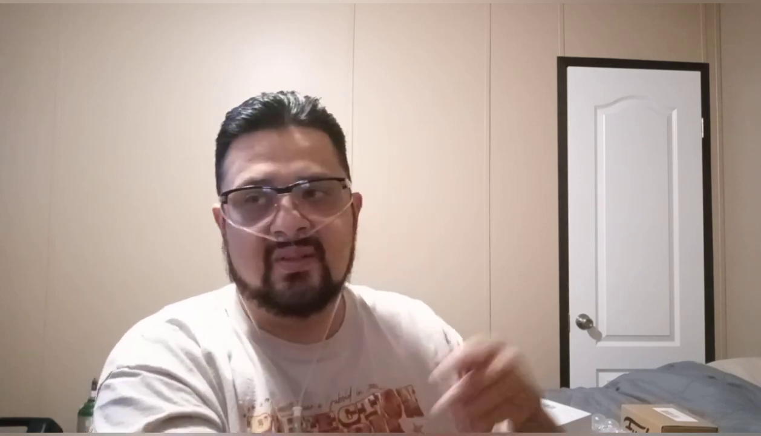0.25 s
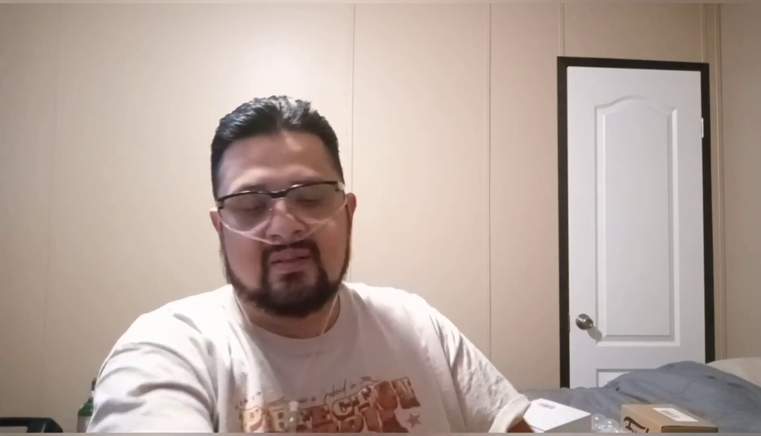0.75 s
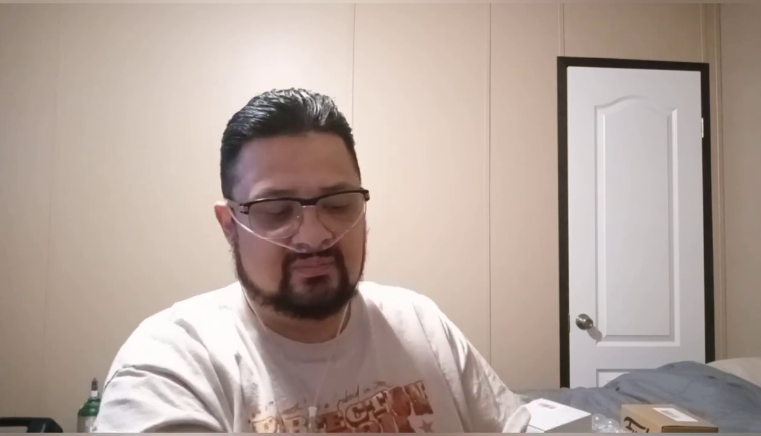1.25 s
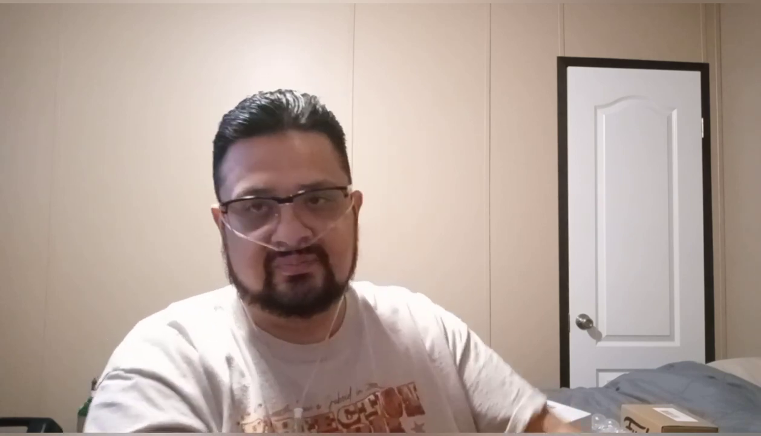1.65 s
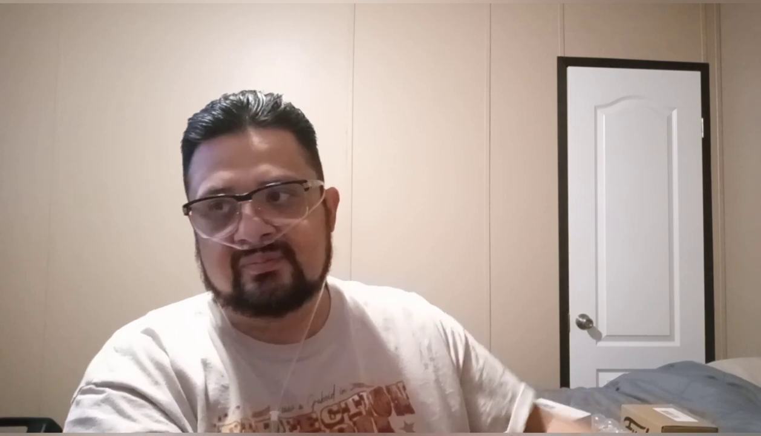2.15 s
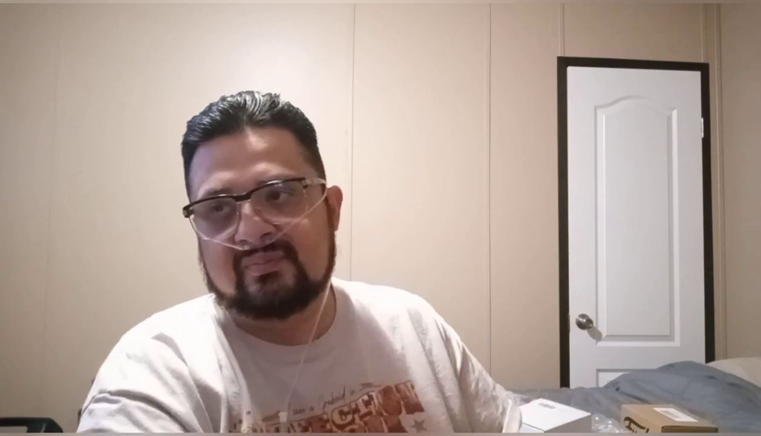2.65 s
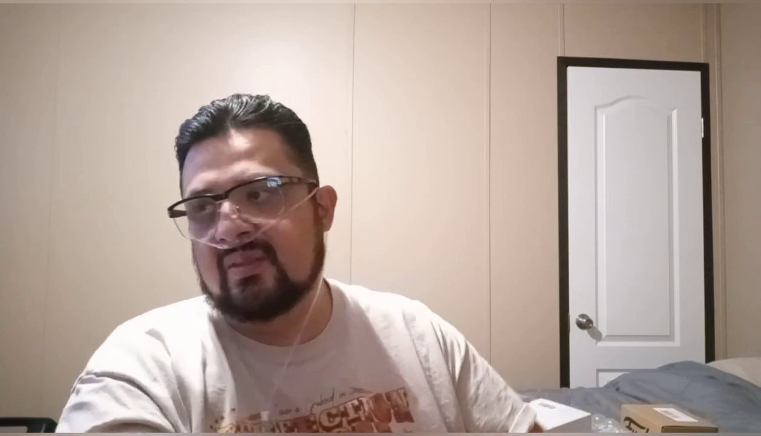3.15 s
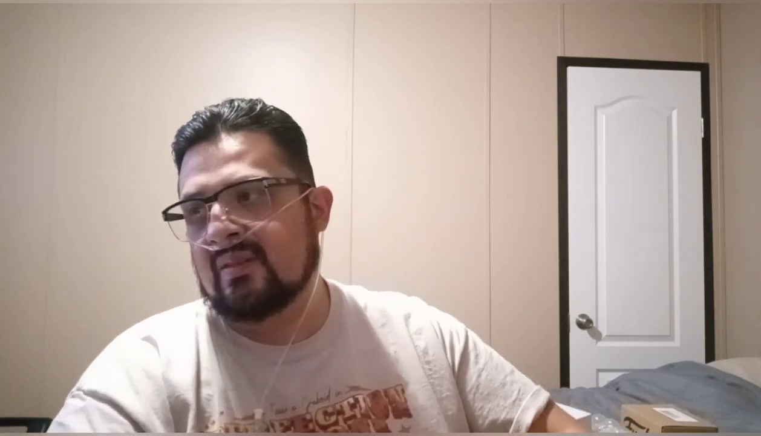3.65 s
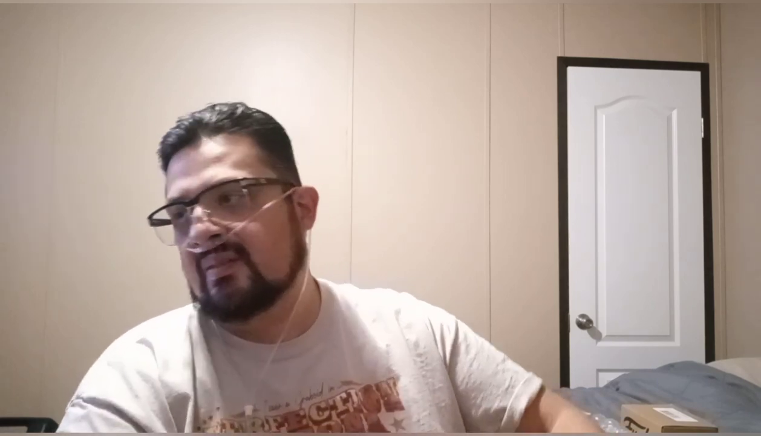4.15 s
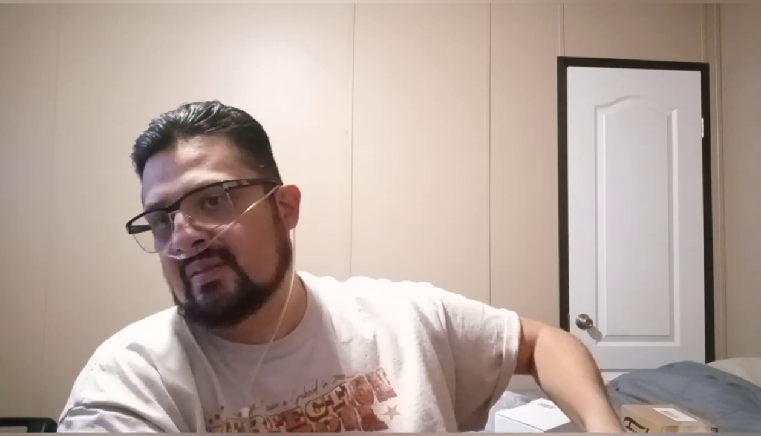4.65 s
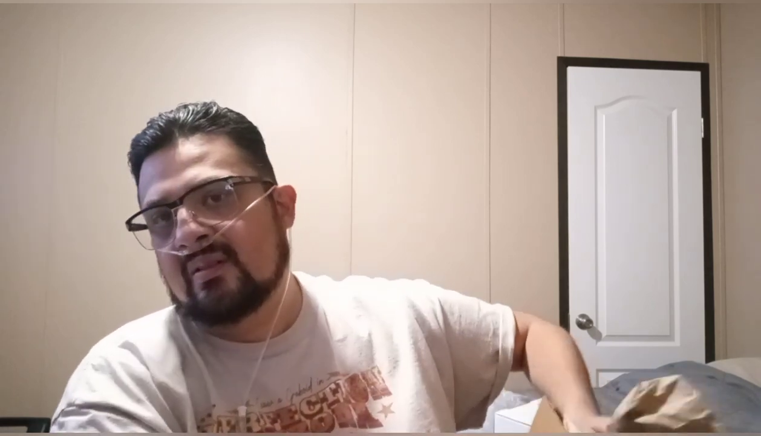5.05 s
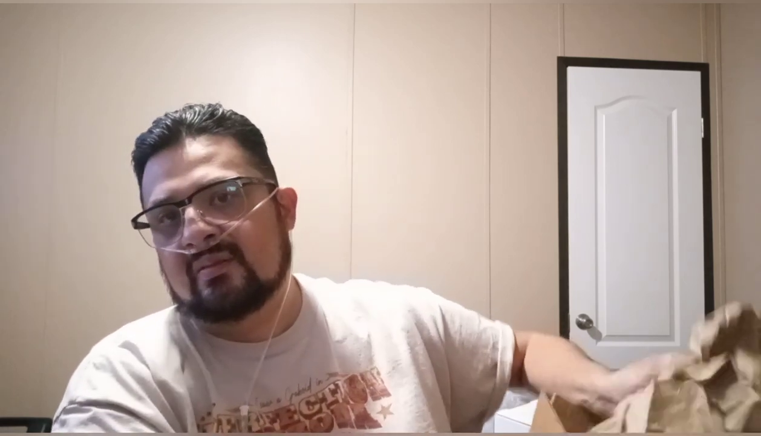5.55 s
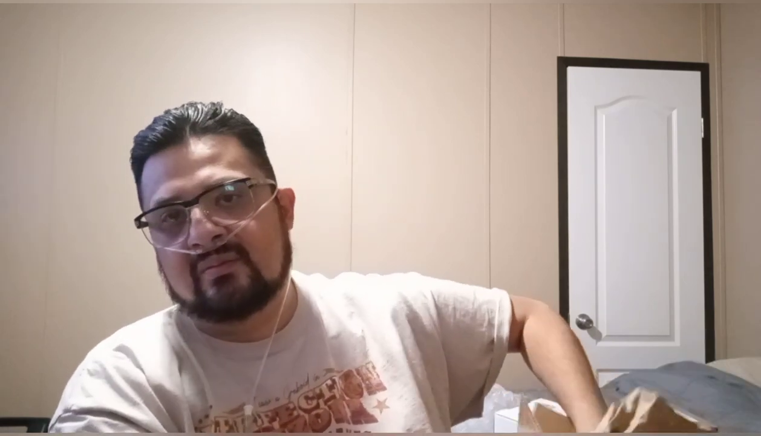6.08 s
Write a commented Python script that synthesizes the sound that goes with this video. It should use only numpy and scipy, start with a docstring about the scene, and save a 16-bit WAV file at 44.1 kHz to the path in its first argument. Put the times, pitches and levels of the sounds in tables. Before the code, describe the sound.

Close, mono sound of stiff paper being handled beside a hollow carton. Quiet scrapes and small creases come first, followed by irregular bursts of crackle with brief dips between them. Then the crumpling swells into strong, dense rustling full of hard bright pops, with low cardboard bumps underneath. The small room is dry, with barely audible background hush, and the paper is still moving loudly when it stops.

```python
"""Crumpled packing paper is pulled out of a cardboard box in a small bedroom, heard by one nearby microphone.
The rustle is thousands of short ringing creases over sliding hiss, shaped by tugs at the sheet.
The largest creases snap on their own as ringing folds with noise bursts and cracks of treble.
Knocks sound the box as decaying panel modes; the near walls answer through short noise tails.
A faint hush of filtered noise lies underneath."""
import sys
import numpy as np
from scipy import signal
from scipy.fft import rfft, irfft, next_fast_len
from scipy.io import wavfile
from scipy.ndimage import uniform_filter1d, map_coordinates

SR = 44100
rng = np.random.default_rng(int(sys.argv[2]) if len(sys.argv) > 2 else 0)


def generate_wav(sig):
    """Save sig (samples, or channels by samples) to the path in sys.argv[1] as 16-bit PCM at SR."""
    pcm = np.round(np.clip(np.atleast_2d(sig).T, -1, 1) * 32767).astype(np.int16)
    wavfile.write(sys.argv[1], SR, pcm)


N = 278712

# Response of sheet and microphone together. Each row: frequency in Hz, gain in dB.
PAPER = [(70, -8.5), (108, -10), (155, -4), (330, -3), (430, -8.5), (560, -9.5), (720, -5), (880, -3.5),
         (2400, 3), (3400, -5), (4100, -4.5), (5200, -15.5), (6200, -15), (7200, -8.5), (9400, -19),
         (11200, -20), (15700, -27.5)]


def amp(db):
    """Amplitude ratio of a level in dB."""
    return 10 ** (np.asarray(db) / 20)


def unit(x):
    """x scaled to an RMS of one."""
    return x / np.sqrt(np.mean(x ** 2) + 1e-20)


def along(points, hz):
    """Value at hz, interpolated between (Hz, value) points on a log frequency axis."""
    point_hz, values = np.transpose(points)
    return np.interp(np.log(hz + 1), np.log(point_hz + 1), values)


def wobble(knots_per_s):
    """Smooth random curve: a spline through Gaussian knots."""
    knots = rng.standard_normal(int(N * knots_per_s / SR) + 4)
    return map_coordinates(knots, [np.arange(N) * knots_per_s / SR])


def filtered(x, response):
    """x with its spectrum multiplied by response(hz)."""
    size = next_fast_len(N + SR // 2)  # padded against wrap-around
    hz = np.fft.rfftfreq(size, 1 / SR)
    return irfft(rfft(x, size) * response(hz), size)[..., :N]


def above(hz, edge_hz):
    """Steep high-pass amplitude gain, about one half at the edge."""
    return 1 / (1 + (edge_hz / (hz + 1)) ** 8)


def hush():
    """The faint air of the room: steady noise with a fixed spectrum."""
    # Each row: frequency in Hz, spectral level in dB (shape only).
    air_points = [(40, 11), (150, 2), (300, -16), (600, -22), (2000, -15.5), (5200, -30), (7800, -7),
                  (15700, -13)]
    air = filtered(rng.standard_normal(N), lambda hz: amp(along(air_points, hz)))
    return amp(-62) * unit(air)


def room(x):
    """Walls' answer, each frequency dying at its own speed; the paper moves, so its path keeps changing."""
    # Decay of the walls' answer. Each row: frequency in Hz, t60 in s.
    wall_points = [(100, 0.22), (1000, 0.17), (4000, 0.09), (12000, 0.11)]
    hop = SR // 8
    delay = SR // 300
    padded = np.pad(x, (hop, 2 * hop))
    out = np.zeros(N + 2 * SR)
    for i in range(-hop, N, hop):
        hz, t, z = signal.stft(rng.standard_normal(SR // 3), SR, nperseg=256)
        decay = amp(-60 * t / along(wall_points, hz)[:, None])
        tail = signal.istft(z * decay, SR, nperseg=256)[1]
        piece = padded[i + hop:][:2 * hop] * np.hanning(2 * hop)  # overlapping pieces crossfade
        answer = signal.fftconvolve(piece, tail / np.linalg.norm(tail))
        out[i + hop:][:len(answer)] += answer
    return out[hop - delay:][:N]


def thuds():
    """Each knock rings a cardboard panel as decaying sines; brighter knocks wake its upper modes more."""
    # Knocks on the box. Each row: start in seconds, level in dB, brightness in dB per octave,
    # pitch of the struck panel in Hz.
    knocks = [(0.586, -20, -9, 173.7), (1.051, -17.5, -9.5, 165), (1.078, -26.5, -2, 174.6),
              (1.423, -27.5, -3.5, 174), (2.251, -27, -2, 172.7), (2.524, -34, -16, 178),
              (2.597, -41, 4, 161.7), (2.771, -35, -16, 187), (2.841, -28.5, -12, 167.5),
              (2.88, -32, -14.5, 190), (3.04, -38, 6.5, 165), (3.05, -46, 7.5, 163.5),
              (3.064, -43, 9, 167.3), (3.243, -29, -6, 171), (3.709, -24.5, -11, 150),
              (4.008, -24, -11, 175), (4.05, -27, -14.5, 158), (4.589, -31, -8, 168), (5.076, -27, -8, 165),
              (5.11, -30.5, -8, 167), (5.571, -32, 3.5, 157), (5.749, -52, -12, 170),
              (5.935, -21.5, -6, 158), (6.295, -17, -5.5, 153)]
    # Panel modes. Each row: multiple of the panel's pitch, level in dB, t60 in s.
    panel_modes = [(.45, -15.5, 0.11), (1, 5.5, 0.077), (1.9, 3, 0.099), (4.3, 2, 0.1), (5.3, 3, .095),
                   (7.4, 0.5, 0.12)]
    out = np.zeros(N + SR)
    t = np.arange(SR // 3) / SR
    soft_start = 1 - np.exp(-t / 0.0035)  # a soft hand
    for start_s, db, bright_db, hz in knocks:
        luck_db = rng.normal(0, 2.1, len(panel_modes))
        ring = np.zeros(len(t))
        for (ratio, mode_db, t60_s), chance_db in zip(panel_modes, luck_db):
            level_db = mode_db + chance_db + bright_db * np.log2(ratio)
            ring += amp(level_db - 60 * t / t60_s) * np.sin(2 * np.pi * ratio * hz * t)
        out[round(start_s * SR):][:len(t)] += amp(db) * ring * soft_start
    return out[:N]


def pull():
    """Levels in dB of body, treble and low mids: every tug rises, holds and falls, and their powers add."""
    # Tugs at the sheet. Each row: full strength at s, level in dB, s to rise 20 dB, s to hold, s to fall 20 dB,
    # treble over body in dB, low mids over body in dB. Short or negative rises and falls take the floors below.
    tug_rows = [(0.0, -43, .01, 0.011, .25, -9, -4), (0.086, -44.5, 0, 0.046, 0.02, -8.5, -1.5),
                (0.175, -47.5, .08, 0.014, .14, -7, -1.5), (0.293, -57, .005, .01, 0.4, -12, -20),
                (0.394, -56, -0.6, .015, 0.1, -24, 2), (0.468, -43.5, -0.06, .04, 0.6, -6.5, -4),
                (0.589, -28.5, -0.0732, 0.024, 0.04, -7.5, 2), (0.687, -34.5, 0.16, 0, 0.14, -10, -2.5),
                (0.844, -36.5, 0.08, .03, 0.65, -8.5, -3.5), (0.896, -30, -0.04, 0.023, 0.05, -13, -7.5),
                (1.074, -31.5, -0.12, 0.038, .1, -19, 0), (1.131, -34, 0.06, .01, 0.26, -8.5, -3),
                (1.354, -30, 0.28, 0.092, 0.14, -6.5, -5.5), (1.584, -37, 0.46, 0, 0.7, -7, -5),
                (1.705, -34.5, -0.34, 0.008, 0.2, -2, -5), (1.757, -30, -0.45, 0.0017, 0, -6, -12),
                (1.988, -39, 0.85, 0.016, 0.9, -6, -1), (2.108, -40, .2, 0.032, 1, -6.5, -5.5),
                (2.249, -25.5, 0, 0.0064, 0.06, -2.5, -0.5), (2.299, -32, -0.1, 0, 0.18, -5, -7),
                (2.496, -33.5, 0.14, 0.01, 0.36, -1, -11.5), (2.598, -28.5, 0.05, 0.008, .1, -7, -3.5),
                (2.66, -34.5, -0.06, 0.0088, 0.34, -24, -5), (2.768, -35, -0.1, 0.034, 0.26, -6, -5.5),
                (2.891, -36, .08, 0, .1, -19, -5), (3.052, -22.5, .07, 0, 0.1, -6.5, -2),
                (3.206, -29.5, 0.06, 0.021, -0.3, -5.5, -8), (3.228, -24, .004, 0.23, 0.23, -7, -5.5),
                (3.577, -34.5, .2, 0.12, 0.7, -2.5, -11), (3.627, -24.5, 0.03, .04, 0.23, -7, -6.5),
                (3.705, -22, 0.01, 0.0027, 0.26, -9.5, -6.5), (3.838, -20.5, 0.1, 0.048, .18, -6, -7.5),
                (4.017, -25, -0.05, 0.024, .2, -7.5, -3.5), (4.071, -19, 0, 0, 0.01, -8, -6),
                (4.321, -26.5, 0.3, 0.022, 0.23, -8, -6.5), (4.557, -26.5, 0.21, 0.012, 0.1, -5, -4),
                (4.608, -22.5, 0.08, 0.058, .14, -10, -8), (4.83, -25.5, 0.1, 0, 0.12, -7.5, -4.5),
                (4.89, -30, -0.9, 0.017, 0, -11, -8.5), (4.954, -25.5, -0.33, 0.012, 0, -3.5, -12),
                (5.0, -25.5, -0.44, 0, 0.4, -11, -9.5), (5.04, -28, 0.8, 0.015, 1.4, -14, -11),
                (5.109, -22, 0.1, 0.0029, 0.2, -9.5, -5.5), (5.229, -22, 0, .045, 0.08, -9, -5),
                (5.322, -26.5, -0.15, 0.054, 0.36, -13, -10.5), (5.535, -26, 0.15, 0.0042, 0.7, -9.5, -4),
                (5.574, -19, 0.05, 0.078, 0.22, -4.5, -8.5), (5.757, -23, 0.17, 0, 0.36, -9.5, -7.5),
                (5.851, -22.5, 0.09, .18, 0, -5.5, -6), (6.149, -21.5, .04, 0.02, -0.1, -9.5, -7.5),
                (6.25, -28, 0.7, 0, .2, -7, -17), (6.317, -22, 0.26, 0, .3, -7.5, -6.5)]
    s, db, rise_s, hold_s, fall_s, treble_db, slack_db = np.transpose(tug_rows)[:, :, None]
    t = np.arange(0, N + 32, 32) / SR
    before = (s - t) / np.maximum(rise_s, 0.002)
    after = (t - s - np.abs(hold_s)) / np.maximum(fall_s, 0.05)
    away = np.maximum(np.maximum(before, after), 0)  # in steps of 20 dB
    levels = []
    for extra_db in (0, treble_db, slack_db):
        power = np.sum(amp(db + extra_db - 20 * away) ** 2, axis=0)
        levels.append(np.interp(np.arange(N) / SR, t, 10 * np.log10(power + 1e-12)))
    return levels


def lesser_snaps(count):
    """Middling creases fall at random moments, their levels following the pull."""
    over_pull_db, spread_db = 11, 3
    median_hz, spread_octaves, median_treble_db = 1890, 0.496, -21
    when = rng.random(count) * (N - 1)
    luck = rng.standard_normal((count, 3))
    db = pull()[0][when.astype(int)] + over_pull_db + spread_db * luck[:, 0]
    hz = median_hz * 2 ** (spread_octaves * luck[:, 1])
    treble_db = median_treble_db + spread_db * luck[:, 2]
    return list(zip(when / SR, db, hz, treble_db))


def snaps():
    """A crease flips: its fold rings for a few cycles, with a rough burst around it and a crack of treble."""
    # The largest creases. Each row: start in seconds, level in dB, pitch of the fold in Hz, treble in dB.
    large_creases = [(0.122, -23.5, 797, -15), (0.175, -24.5, 1270, -11), (0.295, -22.5, 2500, -29),
                     (0.394, -30, 1500, -31), (0.469, -28, 1810, -16), (0.492, -26.5, 1030, -2),
                     (0.594, -16, 2400, -17), (0.608, -10, 1540, -18), (0.672, -21, 2460, -22),
                     (0.896, -11, 1210, -25), (0.905, -12, 2000, -24), (1.078, -15, 1120, -21),
                     (1.347, -10, 1700, -14), (1.431, -6, 1870, -9), (1.437, -12, 2660, -6),
                     (1.546, -16, 2130, -11), (1.583, -16.5, 3870, -8), (1.755, -6.5, 2230, -16),
                     (1.774, -10, 1400, -11), (1.843, -7.5, 1490, -20.5), (1.977, -17.5, 2920, -10.5),
                     (2.094, -13, 1510, -24), (2.248, -16, 1750, -3), (2.255, -15, 2600, -10),
                     (2.299, -12, 2760, -20), (2.599, -10, 835, -9), (2.606, -13, 2350, -14),
                     (2.659, -16, 2500, -12), (2.879, -14.5, 2370, -8), (2.885, -13.5, 2010, -9),
                     (3.045, -4, 3930, -22), (3.051, -9.5, 845, -20), (3.225, -8, 2370, -8),
                     (3.285, -5, 1780, -25), (3.32, -7, 2400, -15.5), (3.363, -7, 2120, -6),
                     (3.407, -1, 3960, -17), (3.434, -4, 2040, -6.5), (3.472, -4, 1980, -10),
                     (3.567, -13, 2740, -1.5), (4.012, -1.5, 4100, -9.5), (4.063, -5.5, 2100, -7),
                     (4.609, -1.5, 2080, -12), (4.674, -3.5, 1860, -12), (4.953, -5.5, 1870, -9),
                     (5.002, -5, 1890, -11), (5.079, -4.5, 1930, -9.5), (5.221, -6, 1920, -9.5),
                     (5.391, -9, 3120, -6), (5.575, -1, 1900, -9), (5.732, -4.5, 2300, -12),
                     (5.764, -5, 2400, -24.5), (6.15, -3, 2560, -21)]
    body, crack = np.zeros(N + SR), np.zeros(N + SR)
    t = np.arange(SR // 10) / SR
    flip_s = 0.00088  # the fold gives way over about a millisecond
    after_s = np.maximum(t - flip_s, 0)
    rough_t60_s, crack_t60_s = 0.04, 0.022
    for start_s, db, hz, treble_db in list(large_creases) + lesser_snaps(count=60):
        noise = rng.standard_normal((2, len(t)))
        rise = amp(db) * np.minimum(t / flip_s, 1) ** 2
        band = signal.butter(1, [hz / 2.06, hz * 1.2], "band", fs=SR)
        rough = unit(signal.lfilter(*band, noise[0]))
        ring = np.sin(2 * np.pi * hz * t) * np.exp(-after_s * hz / 3.9)  # falls to 1/e in 3.9 cycles
        burst = amp(-17.5 - 60 * after_s / rough_t60_s) * rough
        start = round(start_s * SR)
        body[start:][:len(t)] += rise * (amp(-9.5) * ring + burst)
        crack[start:][:len(t)] += rise * amp(treble_db - 60 * after_s / crack_t60_s) * noise[1]
    treble = filtered(crack[:N], lambda hz: above(hz, 3900) * amp(along(PAPER, hz) + 14.5))
    return body[:N] + treble


def patchy(x, depth_db):
    """Folds of every size take turns, so the colour drifts in patches of time and frequency."""
    z = signal.stft(x, nperseg=512)[2]
    field = uniform_filter1d(rng.standard_normal(z.shape), 8, axis=0)
    field = uniform_filter1d(field, 6, axis=1)
    return signal.istft(z * amp(depth_db * unit(field)), nperseg=512)[1][:N]


def creases(per_s, spread_db, clump_db, life_s):
    """Clumped little buckles, many small and few large, each ringing briefly at the pitch of its fold."""
    rate_per_s = per_s * amp(clump_db * (wobble(20) + wobble(80)))
    start = np.flatnonzero(rng.random(N) < rate_per_s / SR)
    pitch_pick, size_pick, phase = rng.random((3, len(start), 1))
    hz = 300 * (16000 / 300) ** pitch_pick
    size = amp(spread_db * np.minimum(-np.log(size_pick + 1e-9), 4))
    size = size * (hz / 2000) ** 0.74  # higher folds are stronger
    step = np.arange(SR // 300)
    t = step / SR
    decay = np.exp(-t * np.sqrt(hz / 2000) / life_s)  # life_s holds at 2 kHz
    ring = size * decay * np.sin(2 * np.pi * (hz * t + phase))
    return unit(np.bincount((start[:, None] + step).ravel(), ring.ravel(), N + SR)[:N])


def rustle():
    """One stream of creases over sliding hiss; each tug has its own weight of treble and low mids."""
    # Slow drift of the outer bands. Each row: time in seconds, top over treble in dB, bass over body in dB.
    outer_drift = [(0, -3, -9), (.12, 5.5, -9), (.25, 2, -7.5), (.4, 3, -6), (.5, -6, -11), (.6, -3, -6),
                   (.7, 1.5, -8.5), (.9, 4.5, -11.5), (1.02, 5, -19), (1.1, 4.5, -5), (1.35, -2, -13),
                   (1.7, -2, -10.5), (1.95, -4, -9.5), (2.2, 6, -11.5), (2.3, 0.5, -10), (2.48, 0, -16),
                   (2.7, -7.5, -13), (2.9, -2, -10), (3.3, -5, -15.5), (3.8, -6.5, -14),
                   (4.05, -6.5, -13.5), (4.3, -6.5, -15.5), (4.6, -4.5, -16), (5.1, -5.5, -14.5),
                   (5.4, 4, -19), (5.62, -3, -15), (5.9, -5, -14.5), (6.32, -9, -13.5)]
    # Edges between the five bands, in Hz.
    edges_hz = 460, 1450, 4800, 9400
    s, *columns = np.transpose(outer_drift)
    top_db, bass_db = [np.interp(np.arange(N) / SR, s, column) for column in columns]
    body_db, treble_db, slack_db = pull()
    rubbing = amp(1.9 * wobble(40)) * rng.standard_normal(N)
    stream = creases(3000, spread_db=2.0, clump_db=2.0, life_s=0.00091) + amp(3.0) * rubbing
    stream = filtered(patchy(stream, depth_db=2.0), lambda hz: amp(along(PAPER, hz)))
    low, middle, high, fizz = [filtered(stream, lambda hz: above(hz, edge)) for edge in edges_hz]
    drag, slack, body, crisp = stream - low, low - middle, middle - high, high - fizz
    lumps = amp(2.0 * wobble(18))  # the box is dragged unevenly
    treble = amp(treble_db) * (unit(crisp) + amp(top_db) * unit(fizz))
    low_mids = amp(slack_db) * unit(slack)
    bass = amp(body_db + bass_db) * unit(lumps * drag)
    return amp(body_db) * unit(body) + treble + low_mids + bass


def scene():
    """Paper and box, the walls' answer to them, and the hush, alike in both channels."""
    near = rustle() + snaps() + thuds()
    mix = amp(-1.5) * near + amp(-10.5) * room(near) + hush()
    return np.tile(mix, (2, 1))


def record(dry):
    """The microphone drops the deep bass, rounds off peaks and keeps nothing above its band limit."""
    ceiling, top_hz = 0.6, 15800  # ceiling: amplitude the rounded peaks approach
    heard = filtered(dry, lambda hz: (1j * hz / (44 + 1j * hz)) ** 6)
    rounded = heard / (1 + np.abs(heard / ceiling) ** 4) ** (1 / 4)
    return filtered(rounded, lambda hz: hz < top_hz)


dry = scene()
out = record(dry)
generate_wav(out)
```